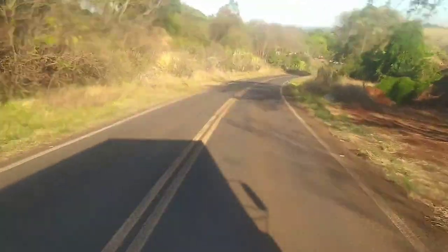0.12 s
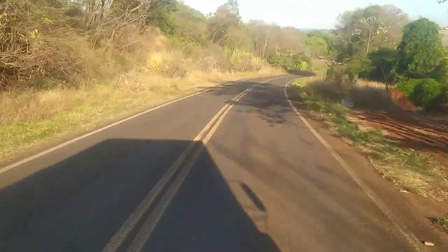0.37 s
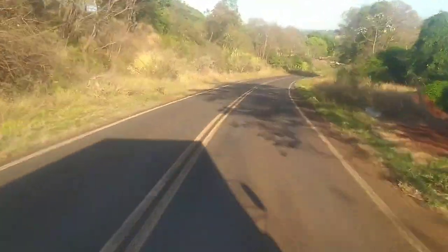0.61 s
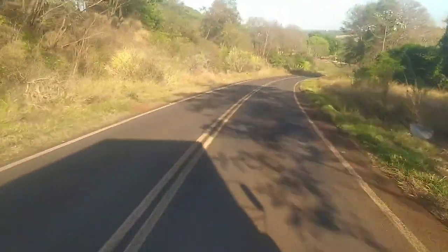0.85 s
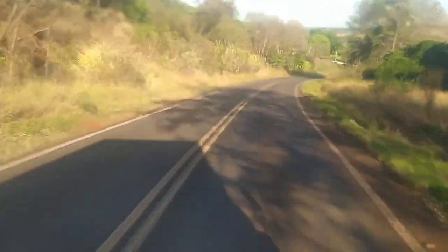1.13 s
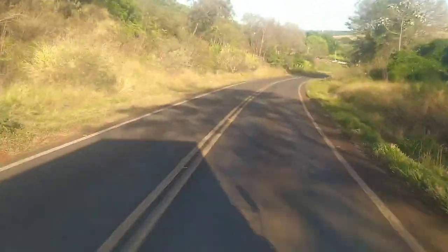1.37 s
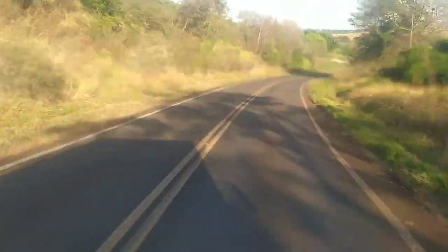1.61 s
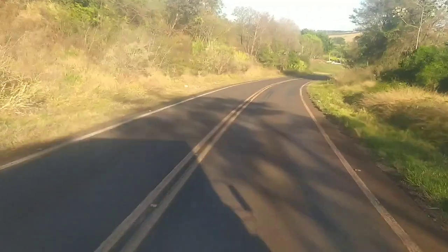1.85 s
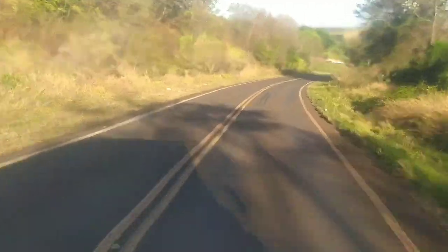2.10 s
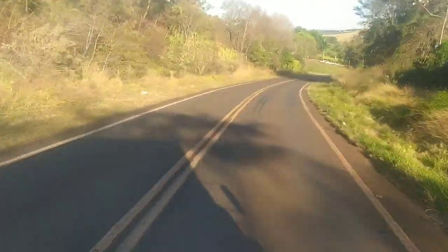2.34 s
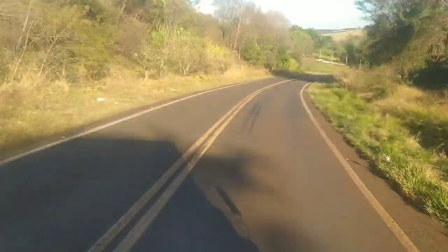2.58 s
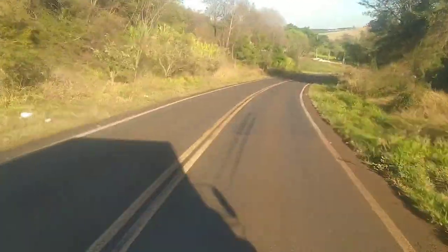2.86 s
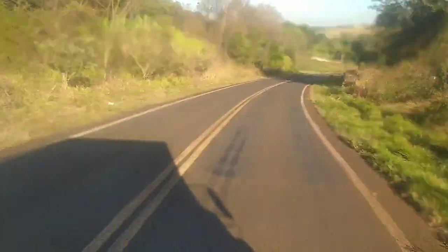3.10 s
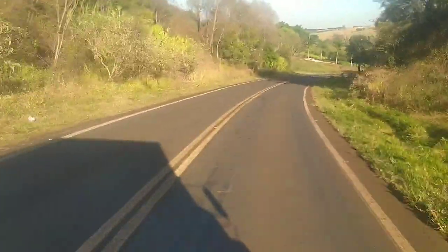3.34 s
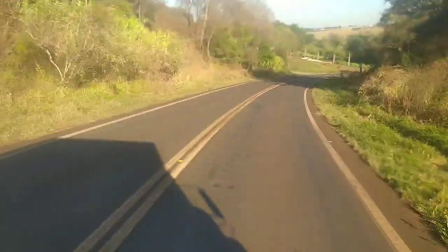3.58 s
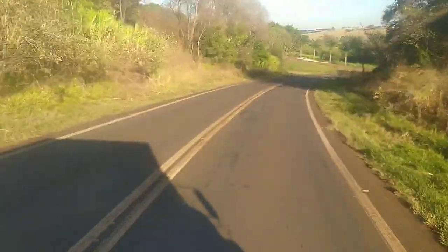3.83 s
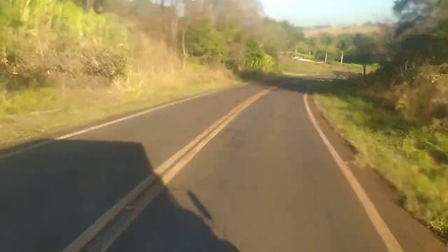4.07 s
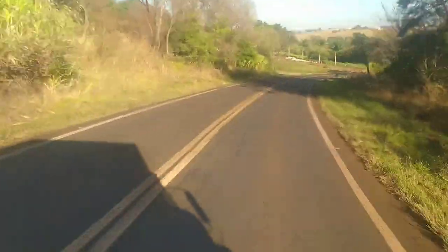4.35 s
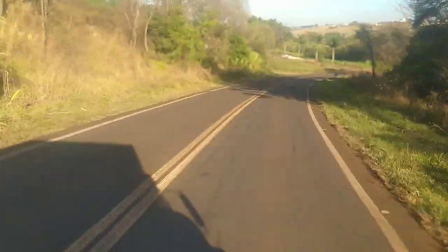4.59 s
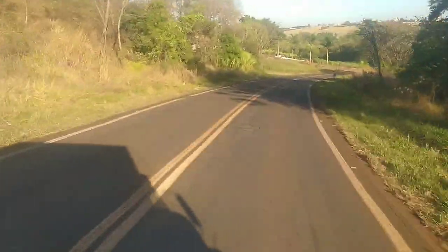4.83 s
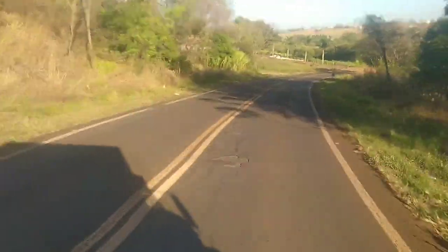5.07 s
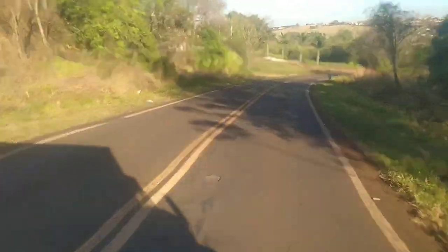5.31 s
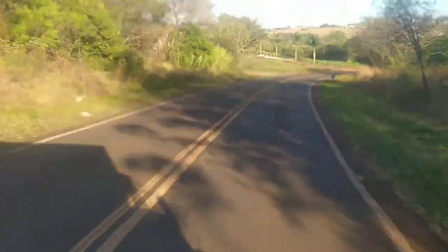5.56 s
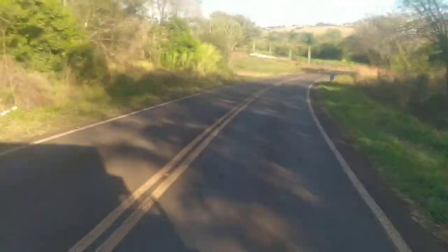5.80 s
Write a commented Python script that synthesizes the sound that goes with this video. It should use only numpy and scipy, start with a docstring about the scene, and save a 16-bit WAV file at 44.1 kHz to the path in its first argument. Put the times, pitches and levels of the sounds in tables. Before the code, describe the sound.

The interior of a truck cruising on a rural road, captured by a phone's two microphones. Throughout, a six-cylinder diesel drones low near 32 Hz with wavering higher orders, its pitch rising very slightly after 3 s and easing back after 4 s. Faint injector clatter lies under it. Deep body boom, a muffled cab roar below 500 Hz, a fluttering tyre whir and thin wind hiss make a constant bed. A dry joint on the right gives millisecond chirps near 9 kHz, irregular, notably around 1.65, 2.6 and 4.0 s. Small trim rattles occur near 0.4, 1.8, 2.1 and 3.4 s, more often around 4 s. From 4.77 to 5.2 s rougher asphalt brings a dense cluster of panel knocks, rattles and bright ticks. It calms partly, then low thumps start at 5.6 s, and the loudest hollow jolts and chattering run from 5.8 s to the end at about 5.9 s.

```python
"""A six-cylinder diesel engine drones in the cab of a truck cruising on a country road: sines at crank orders waver.
Injectors clatter faintly as noise pulsed by the firings; shaped noise gives body boom, cab roar, tyre whir and seal hiss.
A dry joint on the right chirps near 9 kHz as short gliding sines; loose trim and small fittings rattle as noise bursts.
Blows on the cab panel ring decaying modes, most of them late in the scene, where the road roughens.
The two channels are the two microphone ports of a phone, unlike in level, phase and, at high pitches, in waveform."""
import sys
import numpy as np
from scipy import signal
from scipy.fft import rfft, irfft
from scipy.io import wavfile
from scipy.ndimage import uniform_filter1d

SR = 44100
rng = np.random.default_rng(int(sys.argv[2]) if len(sys.argv) > 2 else 0)


def volts_from_decibels(level):
    """Turn decibel levels (scalar or array-like) into linear amplitude factors."""
    exponent = np.asarray(level, float) / 20
    return 10 ** exponent


def store_wav(level_fs):
    """Save 16-bit WAV to argv[1]."""
    pcm = np.round(np.clip(np.atleast_2d(level_fs), -1, 1) * 32767)
    wavfile.write(sys.argv[1], SR, pcm.T.astype(np.int16))


N = 261954
T = np.arange(N) / SR
HZ = np.maximum(np.arange(N // 2 + 1) * SR / N, 1)


def read(table, hz=HZ):
    """Log-frequency interpolation: second column of a spectrum table, joined by straight lines."""
    table = np.array(table)
    return np.interp(np.log(hz), np.log(table[:, 0]), table[:, 1])


def unit(x):
    """Normalisation: scale to rms 1."""
    return x / np.sqrt(np.mean(x ** 2))


def walk(rate):
    """Low-passed random modulation: levels held 1 / rate s, averaged twice over that time, rms 1."""
    hold = int(SR / rate)
    levels = np.repeat(rng.standard_normal(N // hold + 1), hold)
    smooth = uniform_filter1d(uniform_filter1d(levels, hold), hold)
    return unit(smooth[:N])


# Likeness of the noise at the two ports. Each row: frequency in Hz, share common to both (0 to 1).
PORT_LIKENESS = [(30, .999), (95, .95), (200, .9), (258, .66), (322, .88), (390, .75), (450, .4), (650, .4),
                 (780, .2), (1290, .44), (1520, .14), (2100, .3), (2370, .62), (2750, .1), (5400, .15),
                 (20000, .15)]
# Phase lag between the ports. Each row: frequency in Hz, lag of the left port in radians.
PORT_PHASE_LAG = [(30, 0), (130, 0), (320, .2), (390, .9), (650, .8), (1120, 1.6), (1290, 3), (1830, 4.7),
                  (2150, 6.3), (2400, 6.5), (20000, 30)]
# Level balance of the ports. Each row: frequency in Hz, left port against right in dB.
PORT_BALANCE = [(20, 1), (200, -2), (258, 2), (320, -1.5), (390, 0), (450, 2.5), (540, -0.5), (950, -1),
                (1400, 1.5), (1900, 1), (6000, -1.5), (7500, -2.5), (9100, -5), (10500, -7), (14000, 0.5)]


def air(colour):
    """Partial coherence: coloured noise at two ports, alike in the lows, largely unrelated in the highs."""
    right, other = rfft(rng.standard_normal((2, N))) * volts_from_decibels(read(colour))
    like = np.clip(read(PORT_LIKENESS), 0, 1)
    left = like * right + np.sqrt(1 - like ** 2) * other
    left = left * np.exp(-1j * read(PORT_PHASE_LAG)) * volts_from_decibels(read(PORT_BALANCE))
    return unit(irfft(np.array([left, right]), N))


# Crank speed. Each row: time in seconds, turns per second in Hz.
CRANK_SPEED = [(0, 32.24), (3.0, 32.24), (3.4, 32.62), (4.0, 32.78), (4.7, 32.64), (5.3, 32.46),
               (5.94, 32.36)]


def crank_turns():
    """Phase is integrated frequency: turns of the crank since the start."""
    return np.cumsum(np.interp(T, *np.transpose(CRANK_SPEED))) / SR


# Engine orders. Each row: multiple of crank speed, rms level before the gain over time in dB, waver in dB.
ENGINE_ORDERS = [(1, -22.5, 0.8), (1.5, -35, 3), (3, -30.5, 1), (4.5, -40, 3), (5, -29, 2), (6, -24.5, 2),
                 (6.5, -39, 3), (7, -28, 1.5), (9, -33, 2), (10.5, -40, 3), (11.5, -36, 2.5),
                 (13.5, -42, 2), (15, -45, 3), (16, -42, 3), (19.5, -45, 3), (21, -40, 3), (25, -47, 3),
                 (31.5, -44, 3)]
# Uneven level of the engine drone over time, partly chance. Each row: time in seconds,
# gain of the first order, of the fifth and of all others in dB.
DRONE_LEVELS = [(0, 2.5, 0, 0), (.6, 0, -2, 0), (.9, 3, 0, 0), (1.3, 1, 5, 1), (1.5, 2, -8, 2),
                (1.9, 3, 3, 0), (2.1, 4, -5, 2), (2.3, 6, 3, 2), (2.5, 5, 2, -1), (2.85, 6, 3, 0),
                (3.1, 1, 2, 1), (3.45, 4.5, 5, -1), (3.8, 0, 1, -1), (4.1, 5, -5, 0), (4.3, -1, -4, -1),
                (4.5, 4, -2, 0), (4.75, -2, -2, -1), (5.1, 4.5, 2, 0), (5.4, 3, 0, 1), (5.6, 0, -2, -1),
                (5.83, 3, 0, -1), (5.94, 0, 2, 1)]


def drone(turns):
    """Harmonic (order) synthesis: sines locked to the crank, wavering in level and phase."""
    blur_rad = 0.028  # uneven firings smear each order: rms phase scatter per multiple
    s, first_db, fifth_db, other_db = np.transpose(DRONE_LEVELS)
    out = 0
    for multiple, db, waver_db in ENGINE_ORDERS:
        lag = np.array([[read(PORT_PHASE_LAG, multiple * CRANK_SPEED[0][1])], [0]])
        scatter = 0.14 * waver_db * walk(12) + blur_rad * multiple * walk(45)
        phase = 2 * np.pi * (multiple * turns + rng.random()) - lag + scatter
        gain_db = np.interp(T, s, {1: first_db, 5: fifth_db}.get(multiple, other_db))
        level = np.sqrt(2) * volts_from_decibels(db + gain_db + waver_db * walk(9))  # rms to peak
        out = out + level * np.sin(phase)
    return out


# Colour of clatter and loose trim. Each row: frequency in Hz, relative level in dB per Hz.
TRIM_COLOUR = [(150, -33), (400, -5), (1000, 17), (2300, 8.5), (3500, 4), (6500, 4.5), (9000, 7),
               (11500, -4), (13000, -22), (15500, -15)]


def clatter(turns):
    """Amplitude-modulated noise: injectors give a decaying puff at each of three firings a turn."""
    since_firing = 3 * turns % 1  # in firing intervals
    puff = np.exp(-since_firing / 0.97) * volts_from_decibels(5.5 * walk(60))
    return volts_from_decibels(-41) * unit(puff * air(TRIM_COLOUR))


# Roughness of the asphalt under the wheels. Each row: time in seconds, level over smooth road in dB.
ROAD_ROUGHNESS = [(0, 0.5), (.5, 0.5), (1.2, 0), (2.6, 0), (4.0, 0.06), (4.7, 1), (4.85, 2), (5.05, 0.5),
                  (5.3, 2.5), (5.47, 0), (5.7, 1), (5.85, 1.5), (5.94, 2)]


def roughness():
    """Source excitation: roughness in dB, interpolated over time."""
    return np.interp(T, *np.transpose(ROAD_ROUGHNESS))


# Colour of the body boom. Each row: frequency in Hz, relative level in dB per Hz.
BOOM_COLOUR = [(3, -22), (7, -9), (12, -2), (18, 1), (26, -1), (38, -4), (46, -10), (54, -13), (65, -18),
               (85, -17), (120, -21), (200, -43), (800, -90)]


def boom(rough_db):
    """Structure-borne noise: the body booms, rising 0.8 dB per dB of roughness."""
    return volts_from_decibels(-19 + 0.8 * rough_db + 0.5 * walk(5.16)) * air(BOOM_COLOUR)


# Colour of the cab roar. Each row: frequency in Hz, relative level in dB per Hz.
ROAR_COLOUR = [(30, -43), (60, -6.5), (130, -7.5), (170, 0.5), (200, -2), (260, -5), (340, -5), (380, -3),
               (450, -14), (600, -16), (900, -60), (2000, -75)]


def roar(rough_db):
    """Broadband road excitation: the cab roars, following the roughness dB for dB."""
    return volts_from_decibels(-18.5 + rough_db + 0.57 * walk(11)) * air(ROAR_COLOUR)


# Colour of the tyre whir. Each row: frequency in Hz, relative level in dB per Hz.
WHIR_COLOUR = [(150, -84), (510, 0.5), (595, -6.5), (675, 2.5), (720, 0.5), (770, -2), (960, -3.5),
               (1020, -2.5), (1080, -6), (1300, -8.5), (2000, -16), (2350, -17.5), (3200, -24), (6000, -45)]


def whir(rough_db, flutter):
    """Tyre-road noise: a mid band follows the roughness dB for dB and flutters."""
    return volts_from_decibels(-25 + rough_db + 0.7 * flutter) * air(WHIR_COLOUR)


# Colour of the wind hiss at the seals. Each row: frequency in Hz, relative level in dB per Hz.
HISS_COLOUR = [(500, -52), (1500, -14), (3500, 2), (4500, 10), (7300, 9), (8600, 12.5), (9100, 16.5),
               (9700, 13), (10600, 3), (11500, -7), (13000, -8.5), (14500, -14)]


def hiss(flutter):
    """Turbulent flow noise: wind at the seals shares some of the whir's flutter and adds a faster one."""
    return volts_from_decibels(-38 + 0.25 * flutter + 0.8 * walk(40)) * air(HISS_COLOUR)


# Chirps of the dry joint. Each row: start in seconds, length before the fast decay in seconds,
# nominal peak at the right port in dB.
JOINT_SLIPS = [(0.007, 0.0034, -20), (0.116, 0.014, -28), (0.159, 0.0098, -27), (0.253, 0.0071, -17),
               (0.545, 0.008, -31), (0.794, 0.008, -24), (1.06, 0.01, -17), (1.183, 0.006, -24),
               (1.334, 0.011, -24), (1.431, 0.01, -18), (1.623, 0.011, -23), (1.646, 0.011, -13),
               (1.669, 0.006, -27), (1.711, 0.0062, -16), (1.778, 0.0093, -20), (2.114, 0.009, -27),
               (2.138, 0.015, -19.5), (2.201, 0.017, -27), (2.46, 0.01, -30), (2.578, 0.0089, -14.5),
               (2.594, 0.011, -22), (2.621, 0.0073, -28), (2.855, 0.008, -32), (2.893, 0.008, -27),
               (2.954, 0.008, -28.5), (3.046, 0.0065, -23.5), (3.443, 0.0088, -22.5), (3.505, 0.03, -36),
               (3.568, 0.007, -31), (3.68, 0.012, -28), (3.828, 0.006, -29), (3.841, 0.012, -17.5),
               (3.933, 0.014, -24), (3.958, 0.0044, -22), (3.98, 0.044, -25), (4.0237, 0.01, -10),
               (4.047, 0.011, -28), (4.093, 0.012, -19), (4.194, 0.007, -32), (4.427, 0.008, -26),
               (4.78, 0.0056, -25), (4.798, 0.0067, -20), (4.817, 0.0075, -22), (4.841, 0.0038, -21),
               (4.878, 0.024, -22), (4.953, 0.008, -29), (4.985, 0.0065, -19), (5.046, 0.008, -31),
               (5.288, 0.016, -32), (5.492, 0.009, -30), (5.588, 0.008, -36), (5.647, 0.018, -26),
               (5.75, 0.005, -23), (5.767, 0.015, -21), (5.79, 0.0032, -19), (5.933, 0.005, -18)]


def squeaks():
    """Stick-slip: each slip starts fast, climbs to its pitch in a few ms, throbs and dies."""
    settled_hz, spread_hz = 9140, 35  # pitch after the climb and its scatter from slip to slip
    # faint slips at random times: 4 to 12 ms long, -41 to -30 dB
    faint = rng.random((110, 3)) * [N / SR, .008, 11] + [0, .004, -41]
    slips = [*faint, *JOINT_SLIPS]
    drift_hz = 45 * walk(200)
    # the throb runs near six times crank speed
    throb = 1 + .35 * np.sin(2 * np.pi * 6 * CRANK_SPEED[0][1] * T + 2 * walk(20))
    tremble = volts_from_decibels(2.5 * walk(300)) * throb
    out = np.zeros((2, N))
    for (start, length, db), (off, lag) in zip(slips, rng.standard_normal((len(slips), 2))):
        i = int(start * SR)
        t = np.arange(min(int((length + .04) * SR), N - i)) / SR
        span = slice(i, i + len(t))
        pitch = settled_hz + spread_hz * off - 260 * np.exp(-t / 0.0049) + drift_hz[span]
        rise = 1 - np.exp(-t / 0.0011)
        decay = np.exp(-.3 * t / length - np.maximum(t - length, 0) / 0.007)
        port_lag = np.array([[1.8 + 1.3 * lag], [0]])  # radians
        tone = np.sin(2 * np.pi * np.cumsum(pitch) / SR - port_lag)
        out[:, span] += volts_from_decibels(db) * rise * decay * tremble[span] * tone
    return out * volts_from_decibels([[-11], [0]])  # weaker on the left


def burst_noise(bursts, colour, fade_s):
    """Enveloped noise: unevenly flickering bursts start sharply and trail off; overlaps add in power."""
    power = np.zeros(N)
    for start, length, db in bursts:
        t = np.maximum(T - start, 0)
        rise = 1 - np.exp(-t / 0.0008)
        fade = np.exp(-np.maximum(t - length, 0) / fade_s)
        power += (volts_from_decibels(db) * rise * fade) ** 2
    noise = unit(volts_from_decibels(2 * walk(300)) * air(colour))
    return np.sqrt(power) * noise * volts_from_decibels([[-.7], [.7]])


# Bursts of loose trim. Each row: start in seconds, length before the fade in seconds, nominal level in dB.
TRIM_BURSTS = [(0.16, 0.04, -41), (0.427, 0.018, -34), (1.772, 0.026, -34), (2.098, 0.022, -32),
               (3.402, 0.001, -28), (3.8, 0.013, -29), (3.967, 0.0086, -29), (4.02, 0.035, -33),
               (4.138, 0.001, -31), (4.188, 0.022, -33), (4.372, 0.018, -33), (4.767, 0.04, -30),
               (4.814, 0.037, -28), (4.853, 0.012, -29), (4.875, 0.015, -28), (4.934, 0.046, -28.5),
               (4.996, 0.0077, -34), (5.036, 0.0091, -28.5), (5.07, 0.03, -40), (5.118, 0.0091, -29),
               (5.185, 0.032, -30), (5.294, 0.016, -33), (5.549, 0.021, -29.5), (5.669, 0.0032, -25),
               (5.761, 0.019, -28), (5.8, 0.013, -28), (5.826, 0.036, -28), (5.868, 0.018, -26),
               (5.904, 0.017, -23.5)]


def rattles():
    """Repeated impact noise: loose trim chatters, fading with a time constant of 22 ms."""
    return burst_noise(TRIM_BURSTS, TRIM_COLOUR, 0.022)


# Ticks of small hard fittings. Each row: start in seconds, length before the fade in seconds,
# nominal level in dB.
FITTING_TICKS = [(0.433, .003, -34), (3.402, .003, -35), (3.657, .004, -32), (3.788, .004, -31),
                 (4.022, .002, -32), (4.782, .004, -29), (4.826, .006, -32), (4.864, .005, -25),
                 (4.879, .008, -29), (4.955, .008, -39), (5.004, .005, -28), (5.167, .003, -35),
                 (5.212, .004, -38), (5.444, .003, -33), (5.566, .004, -33), (5.673, .004, -39),
                 (5.804, .004, -34), (5.849, .004, -35), (5.872, .004, -33), (5.887, 0.0059, -31),
                 (5.916, .006, -35)]
# Colour of the ticks. Each row: frequency in Hz, relative level in dB per Hz.
FITTING_COLOUR = [(1500, -40), (3500, -17), (5500, -9), (7500, -1), (8700, 1), (10000, -4), (11500, -12),
                  (13000, -18), (15500, -24)]


def ticks():
    """Short impact noise: small hard fittings tick brightly, fading with a time constant of 6 ms."""
    return burst_noise(FITTING_TICKS, FITTING_COLOUR, 0.006)


# Blows on the cab panel over bumps. Each row: start in seconds, nominal level in dB,
# hardness in dB per octave, favoured pitch in Hz.
PANEL_BLOWS = [(1.271, -23, 3, 760), (3.402, -29, 7, 2300), (4.783, -20, 5, 1480), (4.80, -20, 5, 2100),
               (4.82, -17, 5, 890), (4.83, -17, 6, 2300), (4.843, -14, 5.5, 1620), (4.853, -13, 5, 2300),
               (4.866, -19, 7, 3300), (4.87, -14, 4, 1130), (4.913, -19, 4, 760), (4.945, -19, 5, 1620),
               (4.968, -18, 4, 1130), (5.04, -16, 5.5, 2550), (5.062, -20, 5, 1620), (5.085, -20, 5, 2100),
               (5.121, -21, 5.5, 1480), (5.286, -21, 3, 890), (5.606, -16, 0, 335), (5.672, -23, 5.5, 2200),
               (5.721, -15, 0, 335), (5.745, -19, -7, 172), (5.763, -24, 6.5, 2100), (5.8, -7.5, 0, 420),
               (5.82, -7.5, 4, 880), (5.825, -11, 5, 1550), (5.828, -19, 5.5, 2300), (5.842, -15, -7, 172),
               (5.85, -13, 3, 880), (5.862, -9.5, 3, 760), (5.868, -10, -7, 172), (5.903, -9, 4.5, 1130),
               (5.914, -12, -6, 172), (5.92, -9, 0, 335)]
# Modes of the panel. Each row: frequency in Hz, relative level in dB, 60 dB decay time in seconds.
PANEL_MODES = [(172, -5, .25), (335, -6, .09), (420, 0, .22), (760, -8, .09), (880, -6, .14),
               (1130, -11, .08), (1480, -17, .06), (1620, -18, .06), (2100, -24, .05), (2300, -21, .06),
               (2550, -23, .06), (3300, -34, .03), (4600, -35, .03)]


def thuds():
    """Modal synthesis: a blow rings the panel, a harder one its high modes more."""
    favour_db, favour_octaves = 9, .3  # most that other modes fall behind the favoured pitch, and within what span
    out, t = np.zeros(N + SR), np.arange(SR // 10) / SR
    hz, mode_db, t60 = np.transpose(PANEL_MODES)[:, :, None]
    spots = rng.standard_normal((len(PANEL_BLOWS), len(PANEL_MODES), 1))  # each blow lands elsewhere: dB
    for (start, db, hard_db, pitch_hz), spot_db in zip(PANEL_BLOWS, spots):
        away = np.minimum(np.abs(np.log2(hz / pitch_hz)) / favour_octaves, 1)
        tilt_db = hard_db * np.log2(hz / hz[2])  # pivots on the third mode
        level = volts_from_decibels(mode_db + tilt_db + spot_db - favour_db * away)
        ring = level * np.exp(-np.log(1000) * t / t60) * np.sin(2 * np.pi * hz * t)
        i = int(start * SR)
        out[i:i + len(t)] += volts_from_decibels(db) * (1 - np.exp(-t / 0.0032)) * ring.sum(axis=0)
    right = out[:N]
    left = np.roll(right, int(0.00035 * SR))  # about 0.35 ms later
    return np.array([left, right])


def scene():
    """Superposition: everything heard in the cab adds up."""
    turns, rough_db, flutter = crank_turns(), roughness(), walk(12)
    engine = drone(turns) + clatter(turns)
    road = boom(rough_db) + roar(rough_db) + whir(rough_db, flutter) + hiss(flutter)
    return engine + road + squeaks() + rattles() + ticks() + thuds()


def low_pass(x):
    """Removes everything above the highest recorded frequency."""
    return signal.sosfilt(signal.butter(12, 14800, fs=SR, output="sos"), x)


def record(dry):
    """Soft saturation: the phone rounds the loudest peaks."""
    mix = np.tanh(0.8 * dry) / 0.79
    return low_pass(mix)


dry = scene()
out = record(dry)
store_wav(out)
```